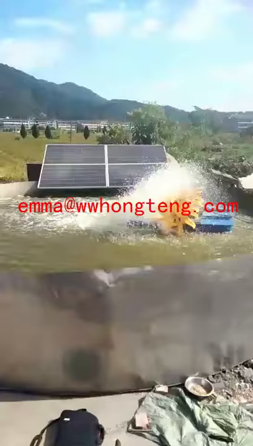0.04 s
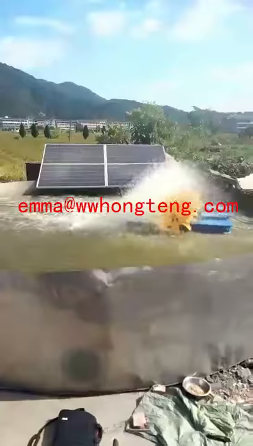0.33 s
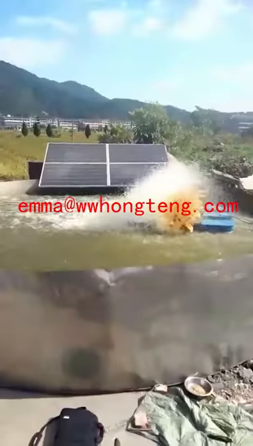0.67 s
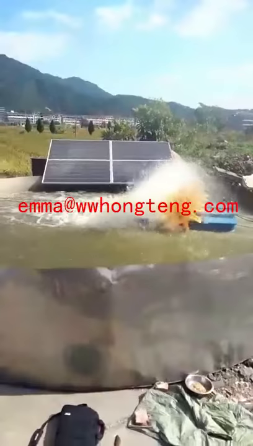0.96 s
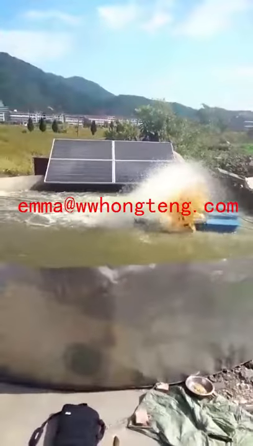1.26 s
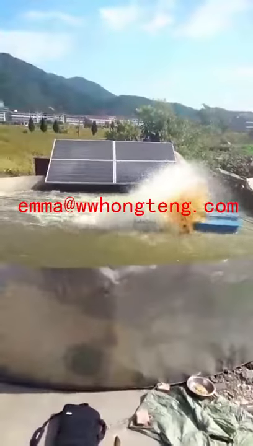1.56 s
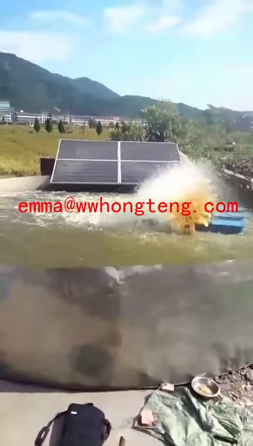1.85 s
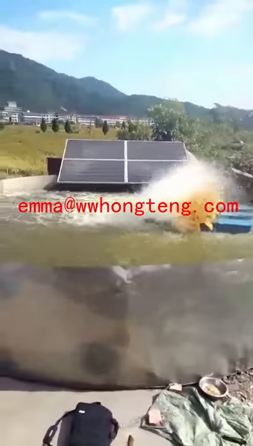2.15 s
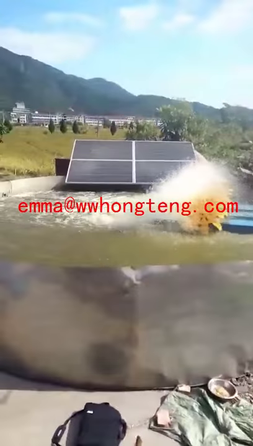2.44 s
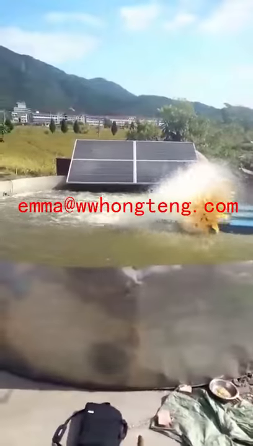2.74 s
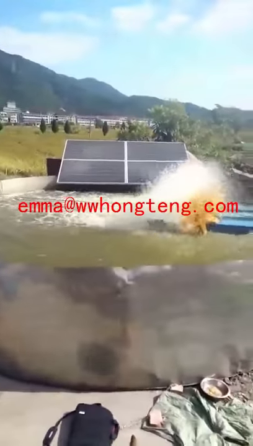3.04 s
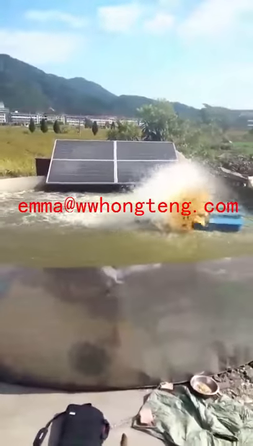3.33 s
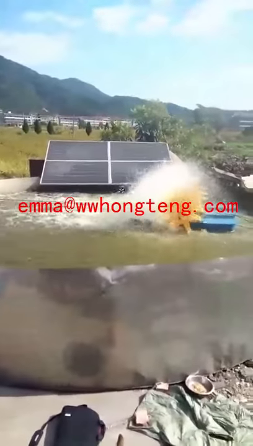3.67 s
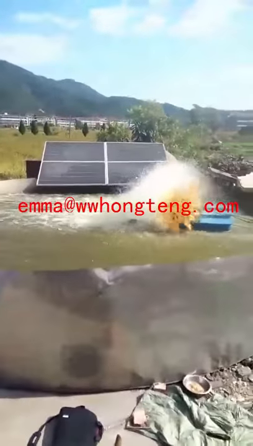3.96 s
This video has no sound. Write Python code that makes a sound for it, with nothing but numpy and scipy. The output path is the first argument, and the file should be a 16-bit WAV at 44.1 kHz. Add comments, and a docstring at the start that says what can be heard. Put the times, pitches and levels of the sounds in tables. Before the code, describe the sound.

Water rushes and splashes as a paddlewheel aerator churns an outdoor pond over a wavering motor hum. After a second it sinks to softer bubbling with a few hollow plops, while wind lightly buffets the microphone.

```python
"""A rush of water starts abruptly: a paddlewheel aerator churns a pond full of ringing bubbles and falling
drops, over a wavering motor hum. After the first second the level drops, and later the treble dulls. A few
hollow plops stand out of the water, and wind nudges the microphone with low buffets."""
import sys
import numpy as np
from scipy import signal
from scipy.fft import rfft, irfft
from scipy.io import wavfile

SR = 44100
rng = np.random.default_rng(int(sys.argv[2]) if len(sys.argv) > 2 else 0)


def unload_audio(sound):
    """Save the sound as a 16-bit wav file, at the path given as the first command line argument."""
    columns = np.transpose(np.atleast_2d(sound))
    # keep every value between -1 and 1, then stretch to whole-number steps
    steps = np.round(np.clip(columns, -1, 1) * 32767)
    wavfile.write(sys.argv[1], SR, steps.astype(np.int16))


N = 176400
T = np.arange(N) / SR
HZ = np.fft.rfftfreq(N, 1 / SR)
SPLIT_HZ, EDGE_HZ = 3080, 7680  # churn lies below the split, spray between split and edge

# Envelope of the rush: t/s, then relative level/dB of body, lower treble and upper treble
RUSH = [(.15, -37.5, -51.5, -52), (.21, -37.5, -50.5, -50), (.31, -37.5, -46.5, -47.5),
        (.45, -38, -50, -51), (.54, -38, -48, -48), (.66, -37.5, -50, -50.5), (.8, -37.5, -48.5, -49),
        (.905, -35.5, -49.5, -51.5), (.95, -39.5, -52, -52), (1.04, -43, -60.5, -50.5),
        (1.2, -49, -63.5, -51), (1.66, -50.5, -64, -52.5), (1.8, -48, -59, -52), (1.96, -48, -65, -53.5),
        (2.44, -47.5, -63.5, -57), (2.6, -46, -60.5, -63), (2.73, -46.5, -65, -68.5),
        (3.41, -48, -65, -69.5), (3.7, -47.5, -63.5, -66), (4, -48.5, -66, -69.5)]


def churn():
    """Superposition: paddles beat the water into foam, bubbles and drops, whose sounds sum to a rush."""
    # Spectral envelopes of the water, loud and after the level drops: f/Hz, relative level/dB
    loud_spectrum = [(150, -34), (260, -0.5), (332, -3.5), (394, -2), (432, -8), (519, -8), (611, -2.5),
                     (837, 0.5), (984, -7), (1770, -5), (1960, -7), (2640, 0), (2950, -7.5), (3840, -40),
                     (6490, -120)]
    soft_spectrum = [(150, -34), (260, 1.5), (332, -7.5), (394, -7), (478, -18.5), (741, -4.5), (863, -6.5),
                     (945, -10.5), (1220, -15.5), (1320, -15), (1430, -16.5), (1770, -9), (1960, -20.5),
                     (2150, -5), (2430, -7.5), (2750, -5), (2950, -14.5), (3840, -63), (6490, -120)]
    dense = wash(patch_db=2, patch_hz=200, patch_s=0.031, surge_db=0.71)
    dense += amp(-8) * bubbles(per_s=2400, cycles=6.7, glide=0.016)
    dense += amp(-11) * unit(drops(per_s=2000, spread_db=3.1))
    sparse = wash(patch_db=3.2, patch_hz=210, patch_s=0.057, surge_db=1.0)
    sparse += amp(-4) * bubbles(per_s=1100, cycles=9.64, glide=0.017)
    sparse += amp(-19.5) * unit(drops(per_s=1600, spread_db=2))
    loud = band(colour(dense, loud_spectrum[1:-1]), 164.7, SPLIT_HZ, order=60)
    soft = band(colour(sparse, soft_spectrum[1:-1]), 164.7, SPLIT_HZ, order=60)
    sunk = np.interp(T, (0.78, 1.26), [0, 1])  # single bubbles stand out more as the level drops
    body_db = curve(RUSH)[0]
    return amp(body_db + 2.5) * ((1 - sunk) * loud + sunk * soft)


def wash(patch_db, patch_hz, patch_s, surge_db):
    """Incoherent summation: countless drops merge into noise, with passing patches and quick surges."""
    f, t, spectra = signal.stft(rng.standard_normal(N), SR, nperseg=1024, noverlap=768)
    field = np.fft.rfft2(rng.standard_normal(spectra.shape))
    across, along = np.fft.fftfreq(len(f), f[1])[:, None], np.fft.rfftfreq(len(t), t[1])
    smoothing = np.exp(-(across * patch_hz) ** 2 - (along * patch_s) ** 2)
    patches = unit(np.fft.irfft2(field * smoothing, spectra.shape))
    gain = amp(np.interp(t, T, patch_db * np.ones(N)) * 2 * np.tanh(patches / 2))
    gain /= np.sqrt(np.mean(gain ** 2, axis=0))  # patches shift power between frequencies
    patchy = signal.istft(spectra * gain, nperseg=1024, noverlap=768)[1][:N]
    return unit(patchy * amp(surge_db * drift(45)))


def bubbles(per_s, cycles, glide, count=36):
    """Damped resonance: each small bubble rings for a few cycles, rising in pitch."""
    t, out = T[:SR // 16], np.zeros(N)
    for hz in np.geomspace(380, 2000, count):
        age = t * hz / cycles  # in decay times
        envelope = (1 - np.exp(-t * hz)) * np.exp(-age)
        ring = envelope * np.sin(2 * np.pi * hz * t * (1 + glide * np.minimum(age, 5)))
        onsets = drops(per_s / count, spread_db=1.84)
        out += (hz / 1000) ** 0.53 * unit(signal.oaconvolve(onsets, ring)[:N])
    return unit(out)


def drops(per_s, spread_db):
    """Shot noise: impacts of uneven size arrive independently, at random times."""
    size = amp(spread_db * np.minimum(rng.exponential(1, N), 4))
    return size * rng.choice([-1, 1], N) * (rng.random(N) < per_s / SR)


def spray():
    """Impact noise: fine drops fall back on the pond as two bands of flickering treble."""
    # Spectral envelopes of the lower and upper band: f/Hz, relative level/dB
    hiss_spectrum = [(1820, -35), (3100, -4), (3770, -6.5), (4060, -5), (4300, -8), (4560, -6), (6350, -4),
                     (7240, -8.5), (7600, -10.5), (9880, -35), (16700, -120)]
    fizz_spectrum = [(5000, -8.5), (6300, -6.5), (7200, 2.5), (7700, -3)]
    # Flicker of the lower band: t/s, nominal depth/dB
    flicker = [(.2, 8.5), (.9, 4), (1.25, 10), (2.2, 7), (2.8, 3), (4, -1)]
    hiss = wash(patch_db=curve(flicker)[0], patch_hz=130, patch_s=0.089, surge_db=1.0)
    hiss += amp(-15.5) * unit(drops(per_s=580, spread_db=3))
    fizz = wash(patch_db=3.0, patch_hz=250, patch_s=0.06, surge_db=1.3)
    fizz += amp(-8) * unit(drops(per_s=600, spread_db=3.8))
    _, lower_db, upper_db = curve(RUSH)
    return (amp(lower_db + 3.5) * band(colour(hiss, hiss_spectrum[1:-1]), SPLIT_HZ, 6210)
            + amp(upper_db + 2) * band(colour(fizz, fizz_spectrum), 5870, EDGE_HZ))


def motor():
    """Amplitude and frequency modulation: a low hum and its faint octave swell and waver."""
    # Course of the hum: t/s, relative level/dB, f/Hz
    hum_course = [(.15, -45, 197.6), (.18, -39, 199.5), (.28, -33, 197.3), (.39, -32, 199),
                  (.48, -42.5, 205.2), (.565, -47, 205.4), (.6, -36.5, 197.8), (.74, -32.5, 201),
                  (.82, -53.5, 198), (.88, -38, 208), (.94, -50, 202.7), (.99, -47, 200),
                  (1.24, -45.5, 200), (1.33, -50, 199), (1.41, -43.5, 194.3), (1.53, -57.5, 195),
                  (1.63, -50, 200), (1.86, -58, 200), (1.96, -50, 200), (2.1, -42, 197.8),
                  (2.17, -56, 200.4), (2.29, -45.5, 202.3), (2.43, -42, 201), (2.63, -55.5, 199.8),
                  (2.7, -43, 201.2), (2.8, -56.5, 201.7), (2.93, -48, 200.4), (3.15, -45.5, 200.1),
                  (3.3, -47, 206.7), (3.48, -46, 202), (3.56, -56, 200.5), (3.68, -39.5, 201),
                  (3.75, -60, 195.6), (3.8, -44, 200), (3.86, -59, 204.7), (4, -59, 201.3)]
    level_db, hz = curve(hum_course)
    phase = 2 * np.pi * np.cumsum(hz + 1.06 * drift(30)) / SR
    tone = amp(0.96 * drift(25)) * (np.sin(phase) + amp(-22) * np.sin(2 * phase))
    sidebands = drift(20) * np.sin(phase) + drift(20) * np.cos(phase)
    return np.sqrt(2) * amp(level_db - 0.5) * (tone + amp(-15) * sidebands)


def plops(rise_s=0.002, fall_s=0.0045, tail_s=0.06):
    """Exponential decay: each hollow, unsteady ring holds briefly with spatter, then leaves a weak tail."""
    # Plops: t/s, duration/s, f/Hz, width of the pitch wander/Hz, level/dB, spatter re ring/dB
    plop_events = [(1.714, 0.016, 868, 130, -39, -10), (1.718, 0.0096, 384.4, 119, -43.5, -20),
                   (1.775, 0.027, 390, 127.1, -39.5, -6), (1.782, 0.044, 880, 255.7, -45.5, -7.5),
                   (1.837, 0.043, 370, 129.7, -51.5, -1), (1.873, 0.022, 907, 136.3, -48, -4),
                   (2.535, 0.038, 770, 110, -48, -13), (2.604, 0.028, 1324, 145, -43.5, -11),
                   (2.652, 0.022, 1230, 308, -43, -20), (3.017, 0.028, 770, 129.4, -45, -15),
                   (3.545, 0.031, 632, 146.6, -48.5, -16), (3.771, .04, 730, 121.1, -43.5, -28)]
    # Spectral envelope of the spatter: f/Hz, relative level/dB
    spatter_spectrum = [(300, -2), (1000, -21.5), (3200, -11)]
    out = np.zeros(N)
    for start, duration, hz, width, level_db, spatter_db in plop_events:
        age = np.maximum(T - start, 0)
        attack = np.minimum(age / rise_s, 1)
        burst = np.exp(-np.maximum(age - duration, 0) / fall_s)
        phase = 2 * np.pi * np.cumsum(hz + width / 2 * drift(130)) / SR
        ring = np.sqrt(2) * np.sin(phase) * amp(1.5 * drift(130))
        spatter = amp(spatter_db) * band(colour(rng.standard_normal(N), spatter_spectrum), 250, 3250)
        tail = np.exp(-age / tail_s) * band(rng.standard_normal(N), hz * 0.83, hz * 1.18, order=12)
        out += amp(level_db) * attack * (burst * (ring + spatter) + amp(-6) * tail)
    return out


def wind():
    """Turbulence: pressure fluctuations of the wind buffet the microphone at low frequencies."""
    # Envelope of the buffets: t/s, relative level/dB
    buffets = [(0.2, -59), (0.255, -41.5), (0.29, -56.5), (0.91, -50), (0.97, -63), (1.42, -61.5),
               (1.55, -52), (1.6, -62.5), (1.88, -57.5), (1.93, -52), (2.1, -54), (2.37, -72.5),
               (2.41, -36.5), (2.52, -50.5), (2.62, -47.5), (2.73, -49), (2.775, -40), (2.82, -52),
               (2.86, -42.5), (2.92, -52), (2.99, -50.5), (3.08, -51), (3.13, -41.5), (3.19, -48),
               (3.28, -55), (3.48, -59.5), (3.8, -59), (3.87, -53), (3.96, -38.5), (4.0, -45)]
    # Their spectral envelope: f/Hz, relative level/dB
    buffet_spectrum = [(15, -28.5), (30, -20), (40, -8), (50, -0.5), (60, -2.5), (75, -0.5), (100, -5),
                       (140, -11), (250, -26.5), (600, -59.5)]
    return amp(curve(buffets)[0] + 0.5) * unit(colour(rng.standard_normal(N), buffet_spectrum))


def amp(db):
    """Decibel scale: level to amplitude ratio."""
    return 10 ** (np.asarray(db) / 20)


def unit(x):
    """Normalisation to rms 1."""
    return x / np.sqrt(np.mean(x ** 2) + 1e-20)


def curve(rows):
    """Linear interpolation of each column of a time table."""
    times, *columns = np.transpose(rows)
    return [np.interp(T, times, column) for column in columns]


def colour(x, points):
    """Spectral shaping by a table of f/Hz, level/dB."""
    f, db = np.transpose(points)
    return irfft(rfft(x) * amp(np.interp(np.log(HZ + 1), np.log(f), db)), N)


def band(x, lo_hz, hi_hz, order=40):
    """Steep band-pass filtering, rms 1."""
    f = HZ + 1
    return unit(irfft(rfft(x) / np.sqrt((1 + (lo_hz / f) ** order) * (1 + (f / hi_hz) ** order)), N))


def drift(rate_hz):
    """Smooth random fluctuation: low-passed noise, rms 1."""
    return unit(irfft(rfft(rng.standard_normal(N)) * np.exp(-(HZ / rate_hz) ** 2), N))


def scene():
    """Free-field superposition: all sources add in the open air."""
    return (churn() + spray() + motor() + wind() + plops())[None]


def record(dry, start_s=0.1409):
    """Gating and band limiting: the sound starts abruptly and passes through a steep low-pass."""
    gate = np.clip((T - start_s) / .002, 0, 1)
    low_pass = signal.firwin(1023, EDGE_HZ, window=("kaiser", 9), fs=SR)
    return signal.oaconvolve(dry * gate, low_pass[None], "same")


dry = scene()
out = record(dry)
unload_audio(out)
```